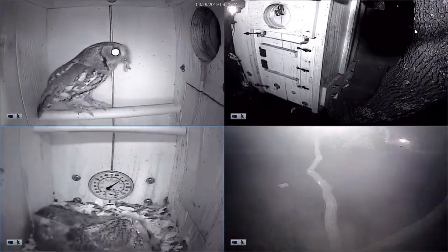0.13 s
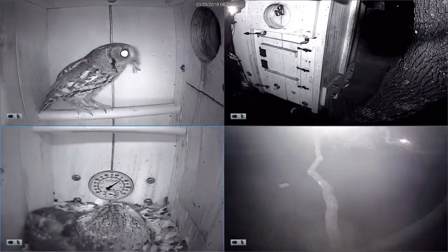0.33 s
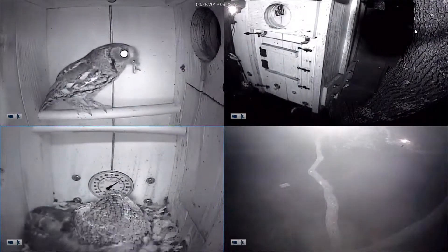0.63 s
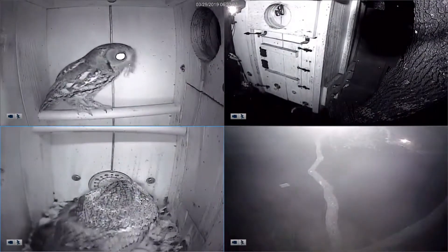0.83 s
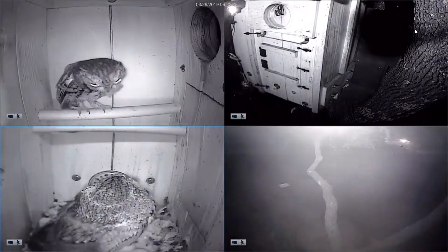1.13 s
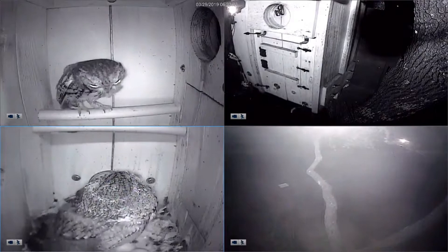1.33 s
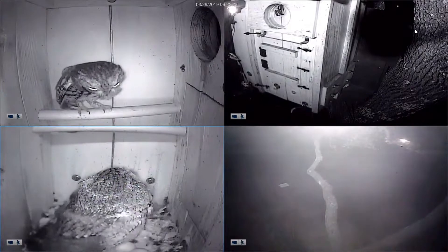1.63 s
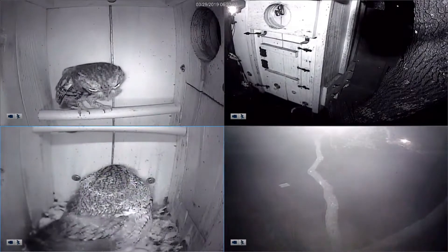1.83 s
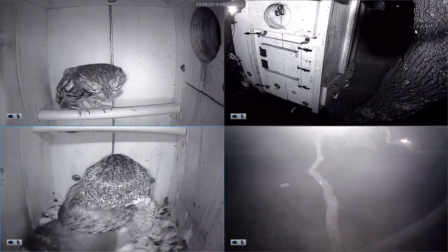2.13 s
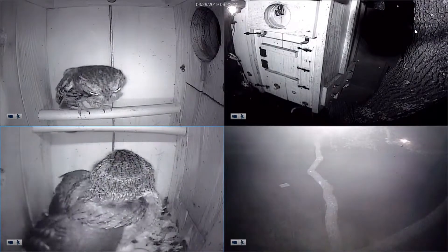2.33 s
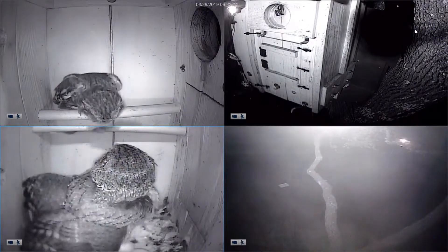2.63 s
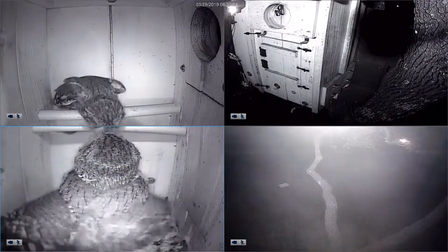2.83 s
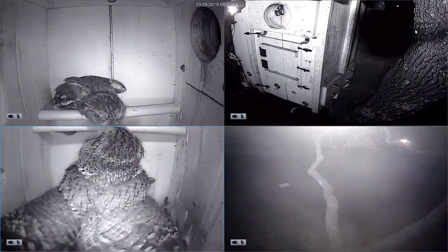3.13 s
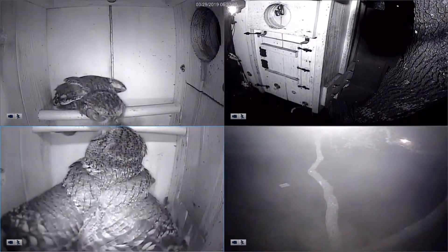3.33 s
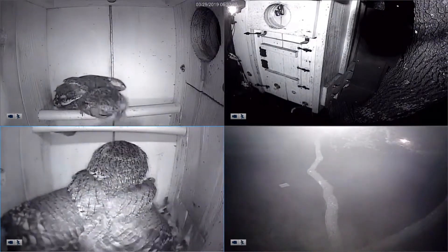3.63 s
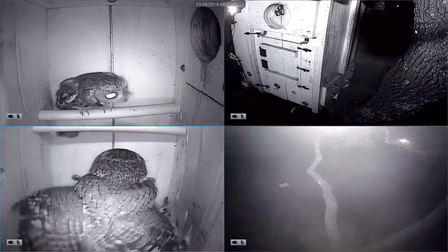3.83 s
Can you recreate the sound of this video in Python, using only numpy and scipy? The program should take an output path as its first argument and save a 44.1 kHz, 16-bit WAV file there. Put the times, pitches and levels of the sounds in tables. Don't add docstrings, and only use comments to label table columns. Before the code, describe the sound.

Owl trill in a nest box: quick pulsed hoots, a pause, then a longer swelling and fading run.

```python
import sys
import numpy as np
from scipy import signal
from scipy.io import wavfile
from scipy.ndimage import uniform_filter1d

SR = 44100
rng = np.random.default_rng(int(sys.argv[2]) if len(sys.argv) > 2 else 0)


def generate_wav(signal):
    frames = np.transpose(np.atleast_2d(signal))
    scaled = np.clip(frames, -1, 1) * 32767
    pcm = np.round(scaled).astype(np.int16)
    wavfile.write(sys.argv[1], SR, pcm)


def amplitude_ratio(level_db):
    exponent = np.asarray(level_db, float) / 20
    return 10 ** exponent


N = 176400


def rms_one(x):
    return x / np.sqrt(np.mean(x ** 2) + 1e-20)


def seconds():
    return np.arange(N) / SR


def drift(rate_hz):
    r = np.exp(-2 * np.pi * rate_hz / SR)
    return rms_one(signal.lfilter([1], [1, -2 * r, r * r], rng.standard_normal(N + SR))[SR:])


def ring(force, hz, t60_s):
    r, w = amplitude_ratio(-60 / (t60_s * SR)), 2 * np.pi * hz / SR
    return signal.lfilter([0, np.sin(w)], [1, -2 * r * np.cos(w), r * r], force + 1e-18)


def resonance(x, hz, width_hz):
    r = np.exp(-np.pi * width_hz / SR)
    zeros = np.array([1, 0, -1]) * (1 - r * r) / 2
    return signal.lfilter(zeros, [1, -2 * r * np.cos(2 * np.pi * hz / SR), r * r], x)


def clicks(start_s, level_db):
    out = np.zeros(N)
    out[np.clip((np.asarray(start_s) * SR).astype(int), 0, N - 1)] = amplitude_ratio(np.asarray(level_db))
    return out


def noise_bursts(start_s, level_db, decay_s):
    envelope = signal.lfilter([1], [1, -np.exp(-1 / (decay_s * SR))], clicks(start_s, level_db) + 1e-18)
    return envelope * rng.standard_normal(N)


def swell(start_s, length_s, power):
    return np.sin(np.pi * np.clip((seconds() - start_s) / length_s, 0, 1)) ** power


def grains(per_s, spread_db):
    hit = rng.random(N) < per_s / SR
    size = amplitude_ratio(spread_db * np.minimum(rng.exponential(1, N), 5))
    return hit * size * rng.standard_normal(N)


def trill():
    # start_s, peak_db, loud_s
    run_one = [(0.025, -24.5, 0.037), (0.101, -23.5, 0.041), (0.181, -24, 0.041), (0.262, -23.5, 0.042),
               (0.342, -23, 0.038), (0.42, -23, 0.035), (0.492, -22.5, 0.031), (0.552, -22.5, 0.031),
               (0.61, -25, 0.032)]
    run_two = [(1.606, -33.0, 0.022), (1.669, -28.5, 0.029), (1.735, -29, 0.029), (1.8, -27, 0.031),
               (1.864, -26, 0.03), (1.928, -25, 0.03), (1.991, -23.5, 0.029), (2.054, -23.5, 0.031),
               (2.118, -23.5, 0.035), (2.191, -22, 0.04), (2.269, -22.5, 0.042), (2.351, -23.5, 0.045),
               (2.433, -22, 0.042), (2.516, -21.5, 0.037), (2.596, -21.5, 0.037), (2.675, -21.5, 0.035),
               (2.748, -20.5, 0.032)]
    run_end = [(2.81, -21, 0.033), (2.866, -20.5, 0.031), (2.922, -22, 0.031), (2.978, -22.5, 0.033),
               (3.037, -22.0, 0.028), (3.094, -22.5, 0.028), (3.151, -23.5, 0.031), (3.209, -27.5, 0.026),
               (3.267, -27.5, 0.029), (3.327, -28.0, 0.027), (3.388, -30, 0.026), (3.452, -33, 0.024),
               (3.508, -29.5, 0.029), (3.567, -31, 0.028), (3.625, -30, 0.029), (3.689, -31, 0.026),
               (3.751, -31.5, 0.026), (3.811, -27.5, 0.027), (3.873, -31, 0.027), (3.932, -29, 0.031),
               (3.992, -28.5, 0.028)]
    # at_s, pitch_hz, octave_db, pop_db, overshoot_hz, high_overtones_db
    voice = [(0, 597.4, -19, -18, 100.5, 3.5), (0.35, 596, -20.5, -18.5, 94.2, -3.5),
             (0.617, 607.5, -22, -22, 69.4, 1.5), (1.599, 602.8, -23.5, -26, 25, -1),
             (1.681, 620, -17, -19.5, 40, 0.5), (1.86, 616.7, -18.5, -24.5, 54.6, 1),
             (2.103, 620, -16, -22.5, 59.9, -4.5), (2.501, 612, -12.5, -20.5, 69.2, -3.5),
             (2.953, 620, -12.5, -25, 39.35, -5.5), (3.149, 624, -18.5, -24, 41.6, -2),
             (3.298, 607, -15.5, -15, 30.3, -4), (3.499, 591.8, -17, -16, 25.5, -7.5),
             (4, 584, -21, -23.5, 25.4, 5.5)]
    low_overtones_db = [-23.5, -28]
    high_overtones_db = [-43, -48.5, -53]
    # mode_hz, level_db, t60_s
    pop_modes = [(415, -2.5, 0.073), (900, -13, 0.029), (320, -6.5, 0.011)]
    lead_s, length_per_loud = 0.003937, 1.337
    rise_power, fall_power, octave_power, overtone_power = 0.72, 0.96, 0.2, 1.3
    sag_s, droop_hz_per_s = 0.011, 120
    box_hz, box_t60_s, box_db = 612, 0.14, -21

    start_s, peak_db, loud_s = np.transpose(list(run_one) + list(run_two) + list(run_end))
    at_s, pitch_hz, octave_db, pop_db, overshoot_hz, high_db = np.transpose(voice)
    start_s, t = start_s - lead_s, seconds()
    length_s = length_per_loud * loud_s
    skew = 0.92 - 14 * (loud_s - 0.035)
    k = np.maximum(np.searchsorted(start_s, t) - 1, 0)
    age_s = np.maximum(t - start_s[k], 0)
    progress = (age_s / length_s[k]) ** skew[k]
    arch = np.sin(np.pi * np.clip(age_s / length_s[k], 0, 1) ** skew[k])
    shape = arch ** np.where(progress < 0.5, rise_power, fall_power)

    hz = np.interp(start_s, at_s, pitch_hz)[k]
    hz = hz + np.interp(start_s, at_s, overshoot_hz)[k] * np.exp(-age_s / sag_s)
    hz = hz - droop_hz_per_s * (age_s - 0.04) + 2.5 * drift(41)
    phase = 2 * np.pi * np.cumsum(hz) / SR

    octave_now_db, high_now_db = np.interp(t, at_s, octave_db), np.interp(t, at_s, high_db)
    octave_onset = 1 - np.exp(-(age_s / 0.016) ** 2)
    octave = amplitude_ratio(octave_now_db) * shape ** octave_power * octave_onset * np.sin(2 * phase + 1.8)
    tone = np.sin(phase) + octave
    for multiple, db in enumerate(low_overtones_db, 3):
        level = amplitude_ratio(db + octave_now_db + 1.6 * drift(26))
        tone += level * shape ** overtone_power * np.sin(multiple * phase)
    for multiple, db in enumerate(high_overtones_db, 5):
        tone += amplitude_ratio(db + high_now_db + 2.3 * drift(39)) * np.sin(multiple * phase)
    tone *= amplitude_ratio(peak_db[k] + 0.5 * drift(49)) * shape

    tail = resonance(tone, box_hz, 0.47 / box_t60_s) * amplitude_ratio(box_db + 10)
    soft = clicks(start_s + 0.00045, peak_db + np.interp(start_s, at_s, pop_db))
    for width_hz in (1300, 1300, 1000):
        soft = resonance(soft, 600, width_hz)
    soft = soft * amplitude_ratio(17.5)
    pops = sum(amplitude_ratio(db + 2.3 * drift(9.5)) * ring(soft, mode_hz, t60_s) for mode_hz, db, t60_s in pop_modes)
    return tone + tail + pops


def coos():
    # start_s, peak_db, pitch_hz, length_s, glide (units of
    # 14 Hz)
    coo_notes = [(.002, -39.5, 602, 0.018, 2), (1.701, -40.5, 930, 0.015, 5),
                 (3.522, -38.5, 953, 0.012, -0.5), (3.625, -44, 936, 0.0075, 3.5),
                 (3.305, -42.5, 562, 0.017, 0.5), (.322, -38, 976, 0.026, -6),
                 (.385, -50.5, 1050, 0.014, -2), (.888, -34, 800, 0.035, -3.7),
                 (1.285, -31, 832, 0.035, 8.5), (1.632, -42.5, 800, 0.027, -1), (1.945, -41, 800, 0.02, 1),
                 (2.8, -44.5, 334, 0.029, 3), (1.459, -42.5, 843, 0.022, 0.5),
                 (1.875, -32, 859, 0.032, -7.5), (2.0, -33, 800, 0.017, 4.5), (2.268, -30.5, 880, 0.023, 5),
                 (2.333, -33.5, 842, 0.013, 0.5), (2.38, -36.5, 782, 0.017, -0.5),
                 (2.686, -33.5, 843, .03, -9.5), (2.793, -36.5, 806, 0.026, -8),
                 (2.842, -38, 814, 0.023, -4), (3.016, -35.5, 900, 0.031, 1.9),
                 (3.135, -38, 859, 0.03, -4.5), (3.185, -35.5, 995, 0.025, 3)]
    chirp_notes = [
        (3.248, -54, 1626, 0.011, 1.5),
        (3.2889, -42.5, 1616, 0.021, 1.5),
        (3.711, -46, 1490, 0.011, 1.5),
        (3.7487, -49, 1610, 0.019, 1.5),
        (3.9065, -51, 1638, 0.021, 0.51),
    ]
    out = 0
    for start_s, peak_db, pitch_hz, length_s, glide in list(coo_notes) + list(chirp_notes):
        age_s = seconds() - start_s + 0.005
        phase = 2 * np.pi * (pitch_hz * age_s + 14 * glide * (age_s ** 2 / length_s - age_s))
        out = out + amplitude_ratio(peak_db) * swell(start_s - 0.005, length_s, 1.4) * np.sin(phase)
    return out + 0.24 * resonance(out, 850, 45)


def feather_colour(x):
    # band_hz, width_hz, level_db
    bands = [(3110, 410, -0.5), (3650, 900, 0.5), (4800, 780, -9), (2230, 810, -6.5)]
    out = 0
    for k, (hz, width_hz, db) in enumerate(bands):
        out = out + (-1) ** k * amplitude_ratio(db) * resonance(resonance(x, hz, width_hz), hz, 3.4 * width_hz)
    return out


def knocks():
    # start_s, peak_db, thud_db, crack_db
    blows = [(1.322, -30, -2, -28), (1.38, -41.5, -2.5, -22), (1.602, -23, -42, -12),
             (3.019, -35.5, -3, -18), (3.355, -28.5, -9, -31), (3.36, -19.5, -8.5, -32.5),
             (3.428, -37, -6, -20), (3.582, -39.5, 1.5, -28), (3.926, -46.5, 1, -32),
             (3.609, -32, -6.5, -25), (3.683, -32, -25, -26), (3.769, -34.5, -6, -24)]
    # mode_hz, t60_s
    wood_modes = [(220, 0.031), (370, 0.036), (560, 0.067)]
    # mode_hz, level_db, t60_s
    air_modes = [(800, -1, 0.082), (900, 1, 0.052), (990, -2, 0.028), (852, -5.5, 0.057), (620, -7.5, .05)]
    contact_s, rebound_s = 0.00081, 0.00348
    start_s, peak_db, thud_db, crack_db = np.transpose(blows)
    push = np.hanning(int(contact_s * SR))

    def contact(level_db, late_s):
        first = clicks(start_s + late_s, level_db)
        rebound = clicks(start_s + late_s + rebound_s, level_db - 3)
        return signal.lfilter(push / push.sum(), 1, first + rebound)

    air = 0
    for k, (hz, db, t60_s) in enumerate(air_modes):
        air = air + ring(contact(peak_db + db - 6.5, 0.0003 * k), hz, t60_s)
    wood = sum(ring(contact(peak_db + thud_db - 5.0, 0), hz, t60_s) for hz, t60_s in wood_modes)
    crack = noise_bursts(start_s, peak_db + crack_db + 4, 0.0025)
    highpass = signal.butter(4, 170, "high", fs=SR, output="sos")
    return signal.sosfilt(highpass, resonance(air, 780, 900) + wood) + feather_colour(crack)


def feathers():
    # start_s, length_s, level_db
    strokes = [(0.746, 0.23, -69), (1.287, 0.084, -64), (1.335, 0.057, -56), (1.393, 0.18, -61.5),
               (2.324, 0.09, -75), (2.556, 0.21, -68), (2.736, 0.12, -73), (2.857, 0.2, -65.5),
               (1.0, 0.065, -80), (3.168, 0.063, -65.5), (3.239, 0.15, -63), (3.369, 0.06, -55.5),
               (3.445, 0.15, -52), (3.598, 0.082, -61), (3.694, 0.084, -65.5), (3.854, 0.09, -66)]
    # start_s, peak_db
    tick_events = [
        (1.0241, -54),
        (1.287, -43),
        (2.4702, -40.5),
        (2.7539, -40.5),
        (3.474, -56),
        (3.5268, -35),
        (3.712, -34.5),
        (3.752, -43),
    ]
    stroke = sum(amplitude_ratio(db) * swell(start_s, length_s, 0.89) for start_s, length_s, db in strokes)
    brush = stroke * amplitude_ratio(1.0 * drift(60)) * rms_one(feather_colour(grains(5400, 1.6)))
    start_s, peak_db = np.transpose(tick_events)
    tick = noise_bursts(start_s - 0.001, peak_db - 3.5, 0.0053)
    return brush + feather_colour(tick)


def litter():
    # at_s, level_db
    contour = [(0, -53), (.8, -54), (1.001, -53.5), (1.249, -56.5), (1.45, -48), (1.751, -52),
               (2.702, -50.5), (3.5, -49), (4, -51)]
    at_s, level_db = np.transpose(contour)
    body = 0
    # mode_hz, width_hz, level_db
    for hz, width_hz, db in [(829, 120, 4.5), (907.5, 100, 0.0), (1024.6, 86, 7.5), (1310, 590, -10.5)]:
        mode = resonance(resonance(grains(1500, 2.5), hz, width_hz), hz, 5 * width_hz)
        body = body + amplitude_ratio(db) * mode
    return amplitude_ratio(np.interp(seconds(), at_s, level_db) + 2.2 * drift(20)) * rms_one(body)


def far_owl():
    # start_s, length_s, level_db
    calls = [
        (0.967, 0.14, -46.5),
        (1.094, 0.15, -49.5),
        (3.451, 0.35, -53.5),
        (3.893, 0.22, -45.5),
    ]
    pitch_hz = 942
    level = sum(amplitude_ratio(db) * swell(start_s, length_s, 0.4) for start_s, length_s, db in calls)
    phase = 2 * np.pi * np.cumsum(pitch_hz + 2.9 * drift(30)) / SR
    return level * amplitude_ratio(1.9 * drift(25)) * np.sin(phase)


def insect():
    hz, width_hz, level_db = 2800, 24, -81
    band = resonance(resonance(rng.standard_normal(N), hz, width_hz), hz, width_hz)
    return amplitude_ratio(level_db + 2.0 * drift(17)) * rms_one(band)


def night_air():
    # band_hz, level_db
    spectrum = [(25, -13), (80, -9), (400, -2), (1000, -5), (1600, -16.5), (2600, -25), (3500, -48),
                (5200, -41.5)]
    # tone_hz, level_db
    hum_tones = [(60, -85), (120, -71), (240, -62.5)]
    air_db = -55
    edges_hz = 20 * 2 ** np.arange(0, 8.6, 0.5)
    white = rng.standard_normal((2, N))
    band_hz, level_db = np.transpose(spectrum)
    air = 0
    for k, (low, high) in enumerate(zip(edges_hz, edges_hz[1:])):
        bandpass = signal.butter(2, [low, high], "band", fs=SR, output="sos")
        band = signal.sosfilt(bandpass, white[k % 2])
        band_db = np.interp(np.log(low * high) / 2, np.log(band_hz), level_db)
        air = air + band * amplitude_ratio(band_db + 1.0 * drift(1.9) + 0.6 * drift(25))
    hum = sum(amplitude_ratio(db - 6.0) * np.sin(2 * np.pi * hz * seconds()) for hz, db in hum_tones)
    return amplitude_ratio(air_db) * rms_one(air) + hum


def scene():
    owls = trill() + coos() + far_owl()
    box = knocks() + feathers() + litter()
    return (owls + box + insect() + night_air())[None]


def roll_off(x):
    return signal.sosfilt(signal.butter(12, 15700, fs=SR, output="sos"), x)


def record(dry):
    glitch_s = [1.4235, 1.876]
    glitch_db = [-36, -58]
    converter_hz, cutoff_hz = 8000, 4490
    grit_db, mirror_db, image_db, hiss_db = -54.5, -3, -67.5, -92
    carrier = np.cos(2 * np.pi * converter_hz * seconds())
    level = uniform_filter1d(np.abs(dry), size=200)
    grit = amplitude_ratio(grit_db) * level * resonance(rng.standard_normal(N), 2400, 3000) * 8
    narrow = signal.sosfilt(signal.butter(8, converter_hz / 2, fs=SR, output="sos"), dry + grit)
    mirror = 2 * amplitude_ratio(mirror_db) * narrow * carrier
    cut = signal.sosfilt(signal.butter(20, cutoff_hz, fs=SR, output="sos"), narrow + mirror)
    image = amplitude_ratio(image_db) * cut * carrier
    hiss = signal.lfilter([1], [1, -0.5], rng.standard_normal(N)) * amplitude_ratio(hiss_db)
    glitch = signal.lfilter([1], [1, -0.5], clicks(glitch_s, glitch_db))
    fade = np.clip((N - np.arange(N)) / 100, 0, 1)
    return roll_off((cut + image) * fade + hiss + glitch)


dry = scene()
out = record(dry)
generate_wav(out)
```